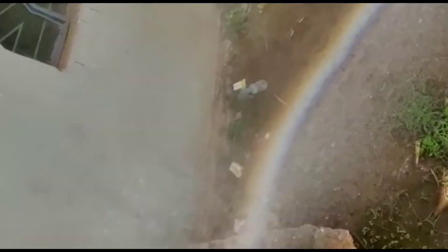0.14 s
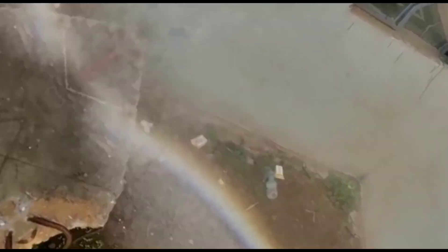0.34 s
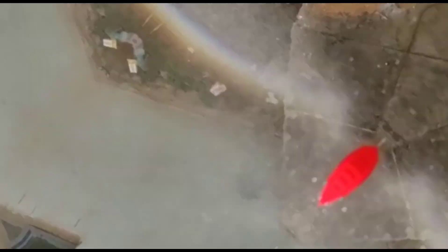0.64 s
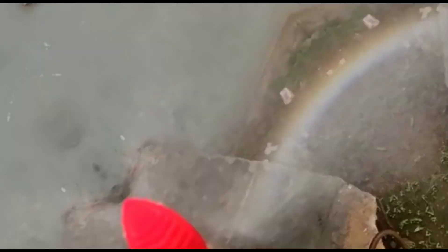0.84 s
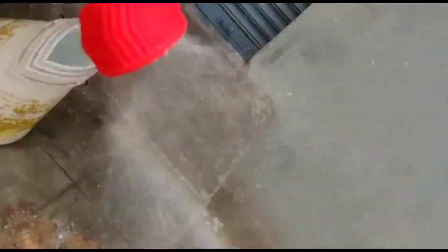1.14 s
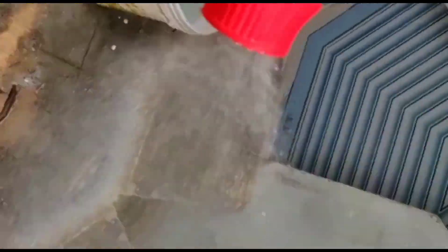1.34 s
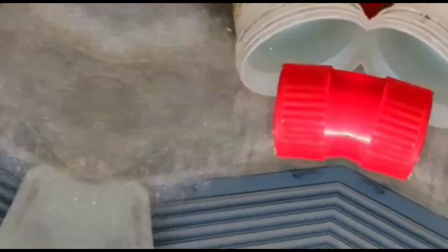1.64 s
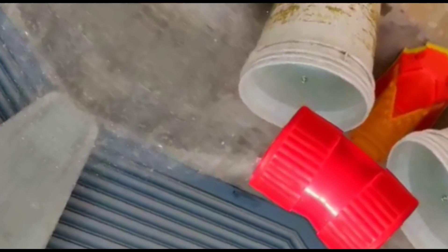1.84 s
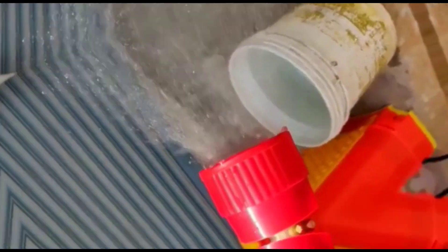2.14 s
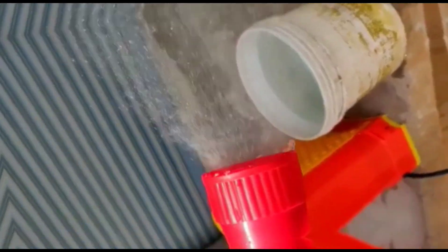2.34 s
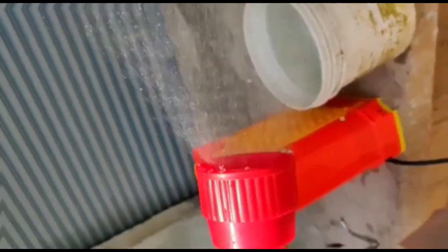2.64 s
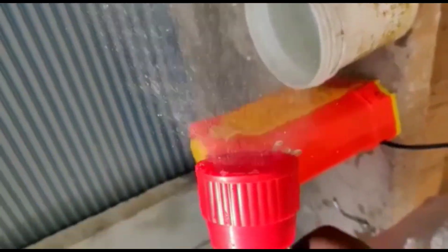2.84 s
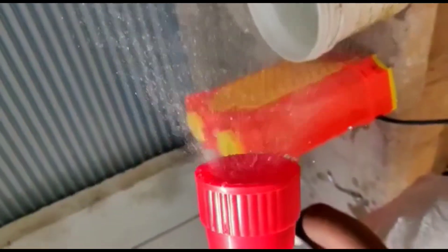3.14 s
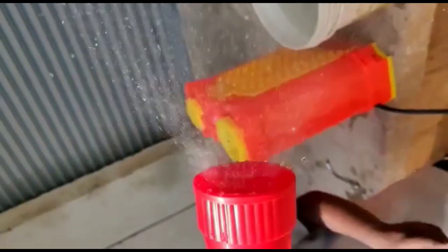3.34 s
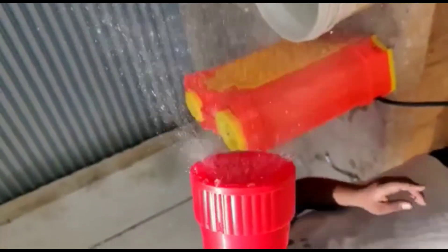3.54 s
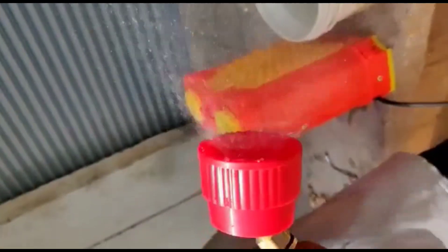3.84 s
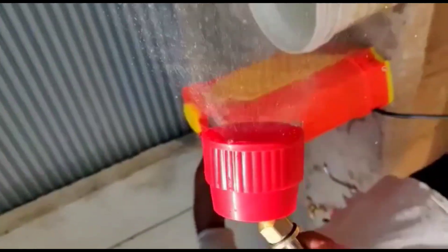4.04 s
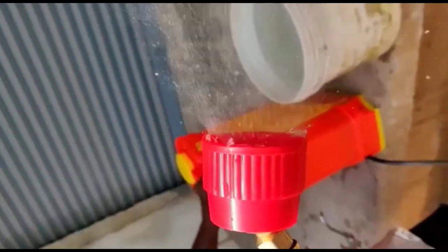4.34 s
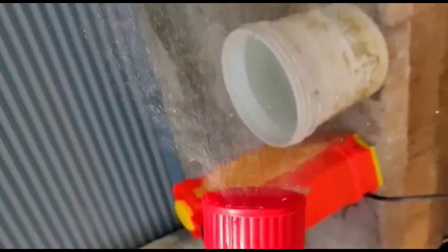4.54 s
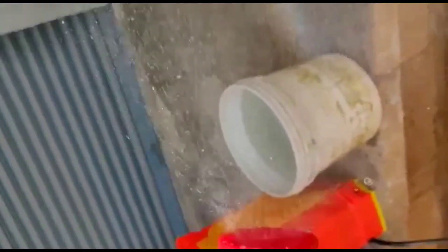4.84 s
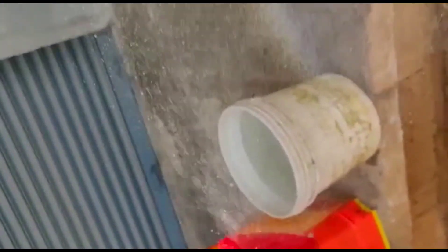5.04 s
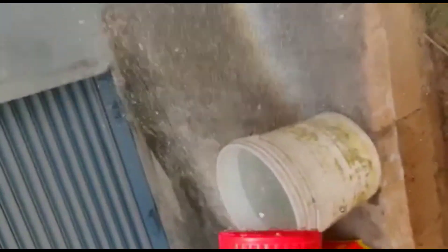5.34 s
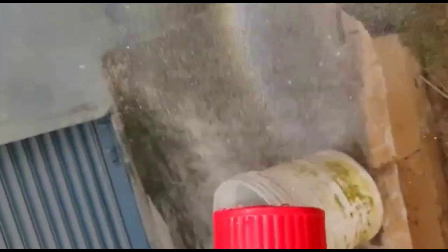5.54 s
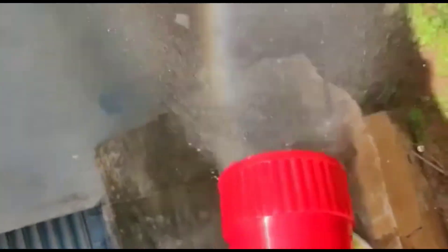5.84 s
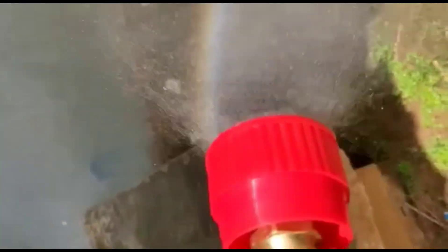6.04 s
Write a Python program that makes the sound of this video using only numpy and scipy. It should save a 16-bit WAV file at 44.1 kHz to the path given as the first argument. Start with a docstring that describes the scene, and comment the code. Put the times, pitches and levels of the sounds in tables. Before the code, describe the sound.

A knapsack sprayer runs without stopping: a hollow, rattling low hum with quick beating, topped by a wide fine hiss leaning left that shifts in brightness as the nozzle moves. Fine drops patter around on concrete. Behind it are quick, regular, rough bird sweeps and a faint low engine. A brief wind puff comes early, and soft knocks of hose or foot late. Close stereo phone pickup in open air.

```python
"""Outdoors, over concrete: a phone follows the hand-held nozzle of a battery sprayer with two diaphragm pumps.
The pumps knock into the plastic tank (pulses and noise through resonances) and throb in the jet (shaped noise).
Mist patters on the concrete, a small bird calls in husky sweeps, and an engine idles far off as slow pulses.
Light wind touches the two microphone ports, a few centimetres apart; a few dull bumps come near the end."""
import sys
import numpy as np
from scipy import signal
from scipy.fft import rfft, irfft
from scipy.io import wavfile
from scipy.ndimage import uniform_filter1d

SR = 44100
rng = np.random.default_rng(int(sys.argv[2]) if len(sys.argv) > 2 else 0)


def wav_out(sig):
    """Save sig, one row per channel (or a flat mono array), as 16-bit PCM at SR to the path in sys.argv[1]."""
    wavfile.write(sys.argv[1], SR, np.round(np.clip(np.atleast_2d(sig).T, -1, 1) * 32767).astype(np.int16))


N = 272266
T = np.arange(N) / SR  # seconds

# Resonances of tank and frame. Each row: frequency in Hz, width in Hz, relative level in dB.
TANK_MODES = [(40, 8.3, -29), (90.4, 15, -13.5), (113.3, 26, -16), (129, 9.8, -5), (157.4, 12, -11),
              (190.5, 8.2, -3.5), (212.3, 7, -4), (222.2, 8.5, -3), (255.7, 20.4, 1.5), (277, 24.5, -2.5),
              (329.9, 8.1, -6.5), (354.3, 11.5, -7), (398, 16.3, -8), (479, 15, -11), (519, 88, -18.5)]
# Stroke tones of the two pumps and their sums, which beat against each other.
# Each row: multiple of the slow rate, multiple of the fast rate, relative level in dB, lag in turns.
STROKE_TONES = [(0, 1, -18, .75), (0, 2, -14, .27), (4, -1, -17, .94), (-.5, 2.5, -20, .71),
                (1, 2, -21, .5), (3, 1, -14, .58), (6.5, .5, -19, .81), (6, 1, -12.5, 0), (7, 1, -9.5, 0),
                (6, 2, -12.5, .07), (3, 3, -18, .05), (2, 3, -20, 0)]
# The faster pump speeds up in small steps. Each row: middle of the step in seconds, new stroke rate in Hz.
FAST_RATE_STEPS = [(1.1, 41.11), (2.6, 41.2), (3.75, 41.37)]
# Jet spectrum at each port. Each row: frequency in Hz, left and right relative levels in dB,
# likeness of the two ports from -1 to 1.
JET_SPECTRUM = [(500, -24, -26, .7), (1200, -16, -18, .7), (1900, -14, -17, .7), (2650, -7.5, -11, .8),
                (3500, -15, -15, .45), (3950, -10, -10.5, .72), (4200, -12, -13, .97),
                (4500, -9.5, -10, .93), (5100, 0, -1, .58), (5700, -4, -9.5, .38), (6450, -1, -15, .33),
                (7200, -10, -15, .35), (7750, -9, -12, .2), (8100, -18, -20, -.62), (9200, -24, -24, -.5),
                (9800, -62, -62, -.5)]
# The jet as the nozzle moves before the phone. Each row: time in seconds, level in dB, left minus right in dB.
JET_PATH = [(0, -27.5, 2), (1, -25.5, 2.5), (1.9, -24.5, 4.5), (3.3, -22.5, 5), (4.4, -24, 5),
            (4.9, -25.5, 4.5), (5.6, -24, 2.5), (6.17, -23, 1)]
# Bands of the spray hiss. Each row: frequency in Hz, share of the sound from 0 to 1.
FIVE_KHZ_BAND = [(4500, 0), (4850, 1), (5500, 1), (5900, 0)]
FOUR_KHZ_BAND = [(2950, 0), (3200, 1), (4500, 1), (4750, 0)]
BRIGHT_BAND = [(5600, 0), (6000, 1), (9000, 1), (9800, 0)]
# Two bands of the spray hiss change level on their own. Each row: time in seconds, gain in dB.
FIVE_KHZ_GAIN = [(0, -4), (.7, -3.5), (1.1, -1), (1.5, 3), (2.2, 4), (2.85, 0.5), (4, -0.5), (4.5, 3),
                 (4.85, -0.5), (5.5, 3.5), (6.17, -3.5)]
FOUR_KHZ_GAIN = [(0, -3), (1, -2), (2.5, -0.5), (4, 1), (5, 4.5), (6.17, -1.5)]
# Thin hiss above the jet, in two bands. Each row: frequency in Hz, relative level in dB.
TOP_HISS_SPECTRUM = [(10700, -27), (11300, 1), (12600, 8), (13700, -2), (14300, -14)]
UPPER_HISS_SPECTRUM = [(13500, -14), (14200, -1), (15100, 1), (16000, -18)]
# Top hiss at the right port. Each row: time in seconds, level in dB.
TOP_HISS_RIGHT = [(0, -55), (1.4, -54.5), (2, -50), (2.5, -51), (3.6, -44.5), (4.5, -50.5), (5.2, -57),
                  (5.7, -52), (6.17, -50)]
# One swell of the upper hiss. In order: start in seconds, end in seconds, rise in dB.
UPPER_HISS_SWELL = (4.6, 5.6, 4.8)
# Mist on the ground. Each row: frequency in Hz, relative level in dB.
MIST_SPECTRUM = [(250, -14), (500, -4), (900, 0), (1600, -3), (2100, -2), (2650, 2), (3150, -1), (3400, -6),
                 (3900, -9), (4300, -26), (4600, -20), (5200, -9), (7500, -12), (8200, -28), (9200, -40)]
# Patter at the two ports. Each row: frequency in Hz, likeness from 0 to 1.
MIST_LIKENESS = [(400, .6), (750, .7), (1600, .45), (2650, .85), (3500, .3)]
# Part of the patter that grows. Each row: frequency in Hz, share from 0 to 1.
MIST_GROWING = [(500, 0), (1100, .6), (2200, 1)]
# A falling and a rising note in each call. Each row: start in seconds from the beat, length in seconds,
# start frequency in Hz, end frequency in Hz, relative level in dB, left minus right in dB.
CALL_NOTES = [(-.04, .075, 6750, 4950, -25.5, 5), (.05, .075, 3650, 4800, -32.5, 0)]
# Far engine. Each row: time in seconds, firing rate in Hz, level in dB.
ENGINE_COURSE = [(0, 14.6, -58), (2, 17.2, -35.5), (2.4, 25, -43), (3, 18.6, -40.5), (4.1, 19, -31.5),
                 (5, 20, -47), (5.5, 22, -37), (6.17, 17, -36)]
# Dull bumps of hose or foot. Each row: time in seconds, relative level in dB.
BUMP_TIMES = [(5.653, -18.5), (5.925, -14.5), (5.956, -23.5)]
# The body that the bumps ring. Each row: frequency in Hz, width in Hz, relative level in dB.
BUMP_BODY = [(130, 22, -3), (218.6, 16, 9.5), (308, 67, -3), (480, 85, -7), (1150, 660, -14.5)]
# Wind rumble. Each row: frequency in Hz, relative level in dB.
WIND_SPECTRUM = [(15, -7), (30, 4.5), (70, -7.5), (120, -9.5), (300, -5), (600, -32)]
# One puff on the ports. In order: time in seconds, level in dB of its short push, half length in seconds.
AIR_PUFF = (.63, -15.5, .008)

# pumps: stroke rates in Hz, and starting places in the stroke cycle in turns
SLOW_HZ, FAST_HZ, STEP_S = 31.085, 40.72, .2
FAST_START, SLOW_START = .98, .89
PUMPS_DB, HUM_DB, CHURN_DB = -30.5, -2.5, -7  # gain of the whole; relative gains of hum and churn
DULL_HZ = 3000
KNOCK_TURNS, LOWS_LATE_S = .17, .015  # place of the knock in the fast stroke; the low tank modes answer late
SLOW_KNOCK_TURNS = .19  # lead of the slow pump's knock
# every second stroke slightly later and stronger; shift by the other shaft
ODD_TURNS, ODD_SIZE, OTHER_TURNS = .01, .04, .006
EDGE_BEAT, EDGE_DEPTH, UPPER_DEPTH = .85, .24, .45  # outer modes: peak in the beat (turns); the upper throb harder
STROKE_DEPTH = .2
BEAT_DROP, BEAT_DEPTH, DROP_S = .26, .95, .008  # where the hum drops in the beat (turns), depth, time of the drop
# nozzle and mist: delays of the right port, which is further away, in seconds
PORT_LAG_S, MIST_LAG_S = 5.2 / 44100, 2.6 / 44100
TOP_LEFT_DB, UPPER_DB = -57, -56  # even top hiss at the left port; upper hiss before its swell
MIST_DB, MIST_DB_PER_S, MIST_PAN_DB = -31.5, 0.62, 3  # pan is left minus right
# bird: an even series of calls that grows to its loudest call and then fades
BIRD_START_S, BIRD_EVERY_S, BIRD_CALLS, BIRD_LOUDEST = .487, .2833, 10, 3
BIRD_SWELL_DB, BIRD_FADE_DB = 0.5, 0.5  # per call, before and after the loudest
HUSK_HZ, BIRD_VARY, BIRD_VARY_DB = 240, .02, .7  # roughness; spread of pitch (share) and level between calls
PUSH_S, SCUFF_S, SCUFF_DB = 0.00011, 0.018, -6.5  # bumps: half length of push, decay and relative level of scuff
GUST_DB, GUST_S = 11, .1  # the rumble swells around the puff
TOP_HZ = 15450
OPPOSITE = np.array([[1], [-1]])  # left and right with opposite sign


def pumps(fast, slow):
    """Valve knocks and churning water ring the tank; both pumps push into one hose, so their pressures interact."""
    # the moment the valve shuts sways with the other pump's pressure
    late = fast - KNOCK_TURNS - 0.088 * np.sin(2 * np.pi * slow)
    early = slow + SLOW_KNOCK_TURNS
    # two strokes a shaft turn, not quite alike
    odd, slow_odd = np.cos(np.pi * late), np.cos(np.pi * early)
    late = late - ODD_TURNS * odd - OTHER_TURNS * slow_odd
    early = early - ODD_TURNS * slow_odd - OTHER_TURNS * odd
    knocks = pulses(late, 1 + ODD_SIZE * odd, jitter_s=.00015, scatter_db=.8)
    knocks += .6 * pulses(early, 1 + ODD_SIZE * slow_odd, jitter_s=.0002, scatter_db=1)
    # water churns after each knock of the fast pump
    churn = np.exp(-(late % 1) / .5) * rng.standard_normal((2, N))
    drive = dull(level(knocks, 0) + level(churn[0], CHURN_DB))

    lows = np.roll(ring(drive, TANK_MODES[:5]), int(LOWS_LATE_S * SR))
    hum = -ring(drive, TANK_MODES[5:10])
    upper = ring(drive, TANK_MODES[10:])
    spread = level(ring(churn[1], TANK_MODES[10:12]), -15.0)

    # the tank swells with the slow stroke and with the beat of the two pumps
    stroke = 1 + .17 * np.cos(2 * np.pi * slow)
    beat = np.cos(2 * np.pi * (fast - slow - EDGE_BEAT))
    edges = (stroke + EDGE_DEPTH * beat) * lows + (stroke + UPPER_DEPTH * beat) * upper
    # the hum builds up through the beat and drops quickly
    build_up = uniform_filter1d((fast - slow - BEAT_DROP) % 1 - .5, int(DROP_S * SR))
    swell = stroke + STROKE_DEPTH * np.cos(2 * np.pi * (late - .08)) + BEAT_DEPTH * build_up
    tones = sum(undb(db) * np.cos(2 * np.pi * (m * slow + n * fast - lag)) for m, n, db, lag in STROKE_TONES)
    near = level(undb(HUM_DB) * swell * hum + edges, 0.39) + swell * tones * undb(walk(1.2))
    return undb(PUMPS_DB) * (near * undb(.7 * OPPOSITE) + swell * spread * OPPOSITE)


def jet(fast, slow):
    """Turbulent spray as shaped noise that throbs with pump pressure; two bands change level on their own."""
    jet_db, pan_db = columns(JET_PATH)
    # pressure reaches the nozzle late
    throb = 1 + .09 * np.cos(2 * np.pi * (fast - .3)) + .06 * np.cos(2 * np.pi * (fast - slow))
    hz, left_db, right_db, alike = np.transpose(JET_SPECTRUM)
    alike = np.clip(alike, -.97, .97)
    shared, own = throb * undb(.5 * walk(15) + 0.84 * walk(400)) * rng.standard_normal((2, N))
    left = colour(shared, hz, left_db)
    right = colour(share(shared, hz, alike), hz, right_db, PORT_LAG_S)
    right += colour(share(own, hz, np.sqrt(1 - alike ** 2)), hz, right_db)  # sound bent round the phone
    spray = level(np.array([left, undb(6.0) * right]), 0)
    spray = spray * undb(jet_db + pan_db / 2 * OPPOSITE)
    spray = move_band(spray, FIVE_KHZ_BAND, columns(FIVE_KHZ_GAIN)[0])
    spray = move_band(spray, FOUR_KHZ_BAND, columns(FOUR_KHZ_GAIN)[0] + 2 * walk(9))
    return move_band(spray, BRIGHT_BAND, 0.78 * walk(14))  # the top of the jet is slightly uneven


def top_hiss():
    """Thin flickering noise: one band even at the left port and varying at the right, one that swells once."""
    top_db = [TOP_LEFT_DB + 0 * T, columns(TOP_HISS_RIGHT)[0]]
    top = undb(top_db) * hiss(TOP_HISS_SPECTRUM, 0, flicker_db=0.5, alike=0.17)
    start, end, rise_db = UPPER_HISS_SWELL
    swell_db = rise_db * np.sin(np.pi * np.clip((T - start) / (end - start), 0, 1)) ** .5
    return top + undb(swell_db) * hiss(UPPER_HISS_SPECTRUM, UPPER_DB, flicker_db=1.2, alike=.5)


def mist(fast, slow):
    """Drops landing all around, as noise with fast random flurries; the bright patter grows steadily."""
    beat = np.cos(2 * np.pi * (fast - slow))
    flurries = (1 + .07 * beat) * undb(.3 * walk(10) + 1.5 * walk(300))
    shared, own = flurries * rng.standard_normal((2, N))
    hz, alike = np.transpose(MIST_LIKENESS)
    right = share(shared, hz, alike) + share(own, hz, np.sqrt(1 - alike ** 2))
    spectrum = np.transpose(MIST_SPECTRUM)
    drops = np.array([colour(shared, *spectrum), colour(right, *spectrum, MIST_LAG_S)])
    drops = move_band(drops, MIST_GROWING, MIST_DB_PER_S * (T - T.mean()))
    return level(drops, MIST_DB) * undb(MIST_PAN_DB / 2 * OPPOSITE)


def bird():
    """Husky sweeps, their pitch and level roughened by noise, blurred by echoes from the walls."""
    out, husk, rasp = np.zeros((2, N)), walk(500), walk(320)
    vary = rng.standard_normal((BIRD_CALLS, 2))
    for call in range(BIRD_CALLS):
        less_db = max(BIRD_SWELL_DB * (BIRD_LOUDEST - call), BIRD_FADE_DB * (call - BIRD_LOUDEST))
        for after, length, from_hz, to_hz, db, pan_db in CALL_NOTES:
            start = BIRD_START_S + call * BIRD_EVERY_S + after
            on = (T > start) & (T < start + length)
            u = (T[on] - start) / length  # 0 to 1 through the note
            hz = (from_hz + (to_hz - from_hz) * u) * (1 + BIRD_VARY * vary[call, 0]) + HUSK_HZ * husk[on]
            loudness = undb(db - less_db + BIRD_VARY_DB * vary[call, 1] + 2 * rasp[on])
            note = loudness * np.sin(np.pi * u) ** .5 * np.sin(2 * np.pi * np.cumsum(hz) / SR)
            out[:, on] += note * undb(pan_db / 2 * OPPOSITE)
    echoes = rng.standard_normal((2, 4000)) * np.exp(-np.arange(4000) / SR / .02)
    return .6 * out + .025 * signal.fftconvolve(out, echoes, axes=1)[:, :N]


def bumps():
    """A short push and a decaying scuff ring a dull body, louder at the right port."""
    scuff = undb(SCUFF_DB) * rng.standard_normal(N)
    blow = np.zeros(N)
    for s, db in BUMP_TIMES:
        push = np.exp(-((T - s) / PUSH_S) ** 2)
        blow += undb(db) * (push + (T > s) * np.exp(-np.abs(T - s) / SCUFF_S) * scuff)
    body = dull(ring(blow, BUMP_BODY))
    return body * np.max(np.abs(blow)) / np.max(np.abs(body)) * undb(-1.5 * OPPOSITE)


def engine():
    """Far idling engine: firings at a wandering rate pass two low exhaust resonances in turn."""
    hz, db = columns(ENGINE_COURSE)
    firings = pulses(np.cumsum(hz) / SR, np.ones(N), jitter_s=.0003, scatter_db=.8)
    exhaust = ring(ring(firings, [(96.7, 26, 0)]), [(96.0, 85, 0)])
    return undb(db) * level(exhaust, 0)


def wind():
    """Air on the ports: low gusty rumble, partly unrelated between them, and one puff in both."""
    spectrum = np.transpose(WIND_SPECTRUM)
    rumble = [colour(undb(0.59 * walk(3.9)) * rng.standard_normal(N), *spectrum) for _ in range(2)]
    s, db, half = AIR_PUFF
    u = (T - s) / half
    gusts = pair(*rumble, alike=.5) * undb(GUST_DB * np.exp(-((T - s - .04) / GUST_S) ** 2))
    puff = np.exp(-u ** 2) - 0.3 * np.exp(-(u / 5.2) ** 2)  # a short push on a longer opposite swing
    return level(gusts, -35.0) + undb(db) * puff


def fast_rate():
    """Stroke rate of the faster pump in Hz; each step is a short ramp."""
    rate, last_hz = FAST_HZ, FAST_HZ
    for s, hz in FAST_RATE_STEPS:
        rate = rate + (hz - last_hz) * np.clip((T - s) / STEP_S + .5, 0, 1)
        last_hz = hz
    return rate


def undb(db):
    """Gain of a dB value."""
    return 10 ** (np.asarray(db) / 20)


def level(x, db):
    """Scale to an rms level."""
    return x * undb(db) / np.sqrt(np.mean(x ** 2))


def columns(table):
    """Every column of a time table after the first, at each sample."""
    s, *rest = np.transpose(table)
    return [np.interp(T, s, c) for c in rest]


def colour(x, hz, db, lag_s=0.):
    """Shape a sound by a spectrum and delay it."""
    f = np.fft.rfftfreq(N, 1 / SR)
    gain = undb(np.interp(np.log(f + 1), np.log(hz), db, left=-80, right=-80))
    return irfft(rfft(x) * gain * np.exp(-2j * np.pi * f * lag_s), N)


def share(x, hz, part):
    """Take a signed part of each frequency."""
    return irfft(rfft(x) * np.interp(np.fft.rfftfreq(N, 1 / SR), hz, part), N)


def move_band(x, band, db):
    """Change the level of one band over time and leave the rest."""
    return x + (undb(db) - 1) * share(x, *np.transpose(band))


def ring(x, modes):
    """Sum of resonances, neighbours in opposite sign."""
    return sum((-1) ** k * undb(db) * signal.lfilter(*signal.iirpeak(hz, hz / width, SR), x)
               for k, (hz, width, db) in enumerate(modes))


def dull(x):
    """Soft contact: little treble."""
    return signal.sosfilt(signal.butter(4, DULL_HZ, fs=SR, output="sos"), x)


def walk(rate):
    """Random levels held 1 / rate seconds, then smoothed twice; spread near 1."""
    k = int(SR / rate)
    held = np.repeat(rng.standard_normal(N // k + 1), k)
    return 1.3 * uniform_filter1d(uniform_filter1d(held, k), k)[:N]


def pulses(turns, size, jitter_s, scatter_db):
    """One pulse for each turn, a little uneven in time and size."""
    at = np.flatnonzero(np.diff(np.floor(turns)) > 0)
    chance = rng.standard_normal((len(at), 2))
    shifted = at + (jitter_s * SR * chance[:, 0]).astype(int)
    out = np.zeros(N)
    out[np.clip(shifted, 0, N - 1)] = size[at] * undb(scatter_db * chance[:, 1])
    return out


def pair(x, y, alike):
    """Left and right from a shared sound and one of opposite sign at the two ports."""
    return np.sqrt((1 + alike) / 2) * x + np.sqrt((1 - alike) / 2) * y * OPPOSITE


def hiss(spectrum, db, flicker_db, alike):
    """Flickering noise, partly shared by the two ports."""
    shared, own = undb(flicker_db * walk(11)) * rng.standard_normal((2, N))
    hz, shape_db = np.transpose(spectrum)
    left = colour(shared, hz, shape_db)
    right = colour(alike * shared + np.sqrt(1 - alike ** 2) * own, hz, shape_db, PORT_LAG_S)
    return np.array([level(left, db), level(right, db)])


def scene():
    """All sources at the two ports; both pump cycles are counted in turns."""
    fast = FAST_START + np.cumsum(fast_rate()) / SR
    slow = SLOW_START + SLOW_HZ * T
    sprayer = pumps(fast, slow) + jet(fast, slow) + top_hiss() + mist(fast, slow)
    return sprayer + engine() + bird() + bumps() + wind()


def record(dry):
    """The phone cuts the top with a steep low-pass."""
    return signal.sosfilt(signal.ellip(16, .3, 80, TOP_HZ, fs=SR, output="sos"), dry)


dry = scene()
out = record(dry)
wav_out(out)
```